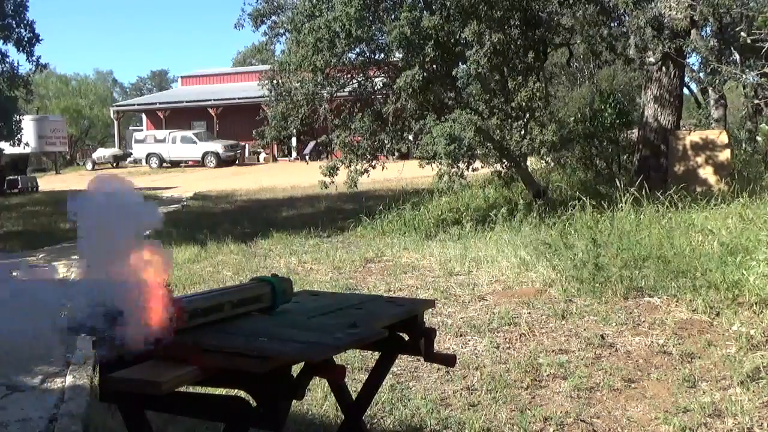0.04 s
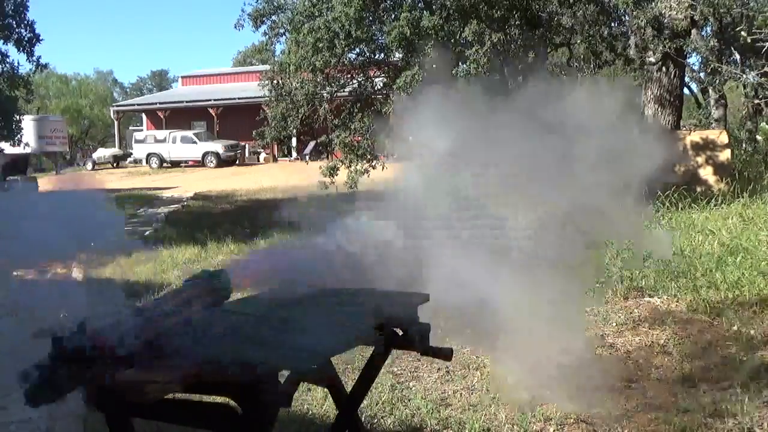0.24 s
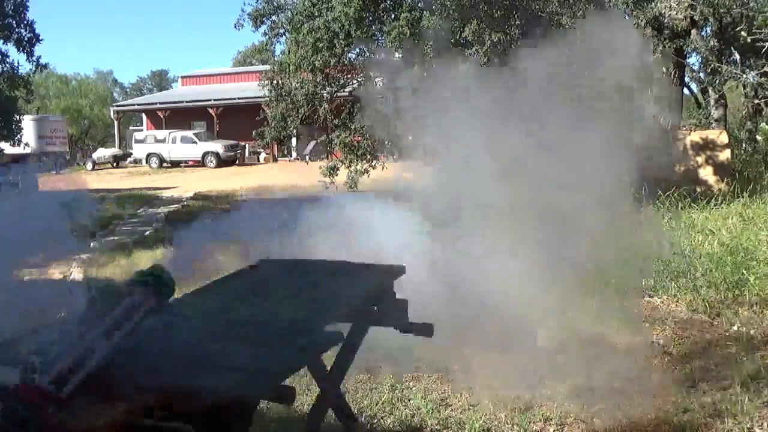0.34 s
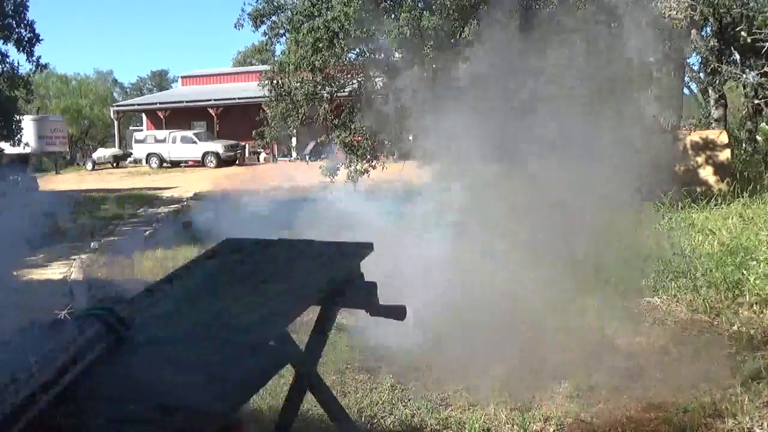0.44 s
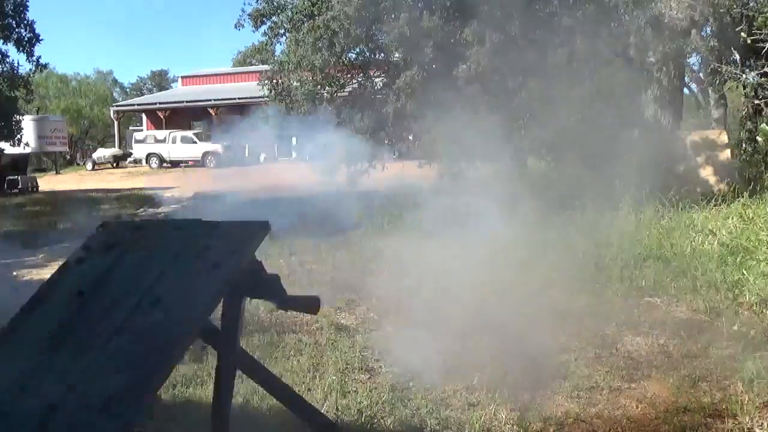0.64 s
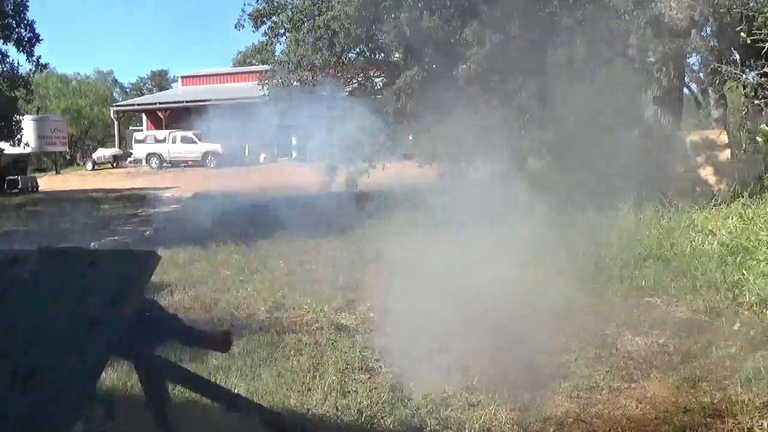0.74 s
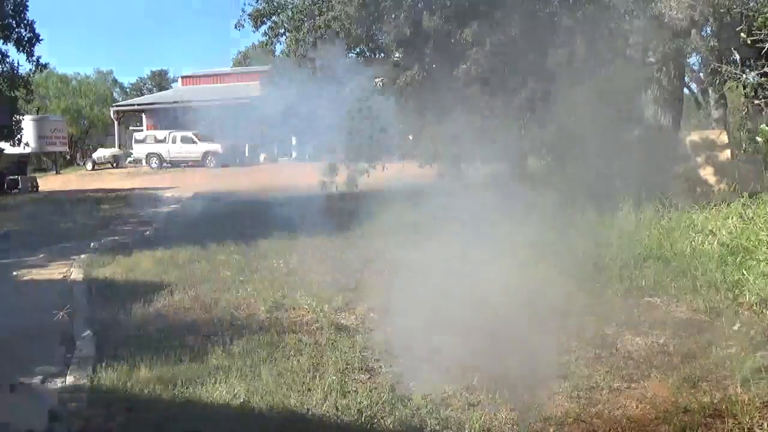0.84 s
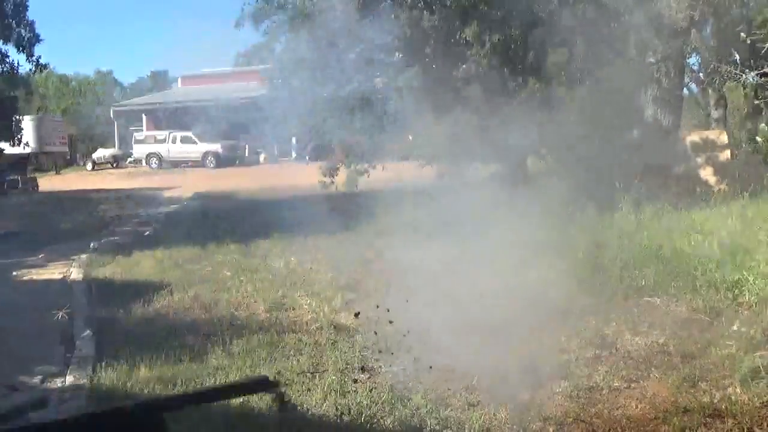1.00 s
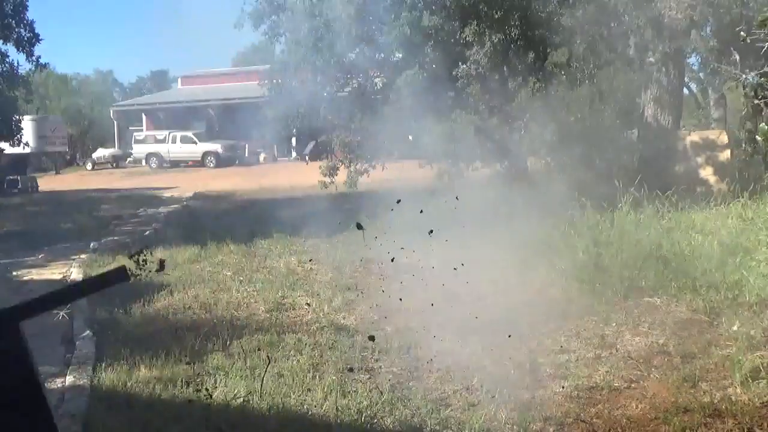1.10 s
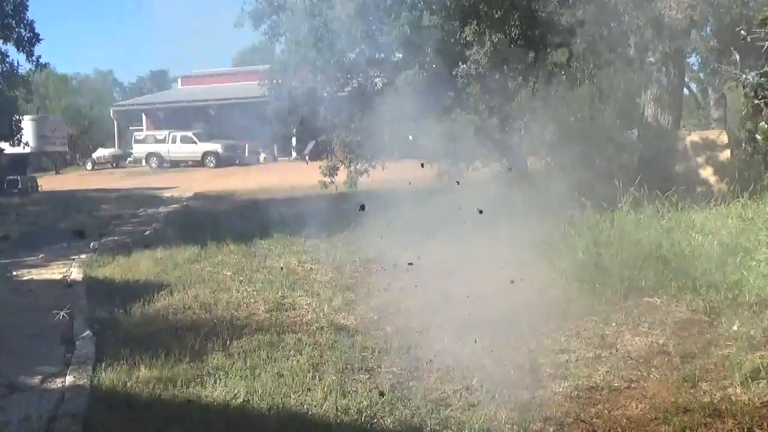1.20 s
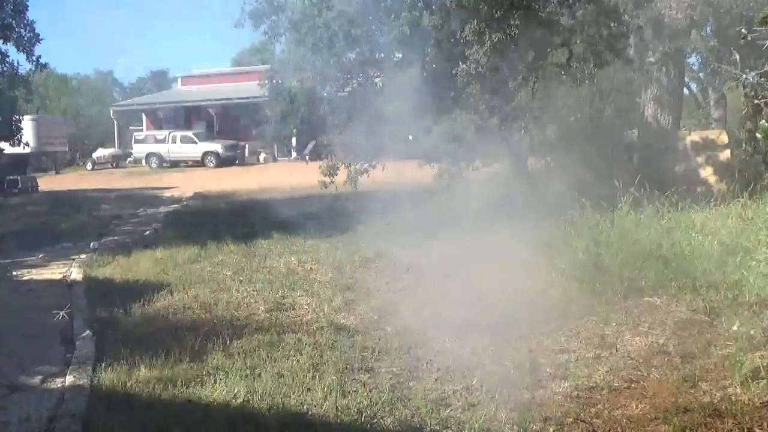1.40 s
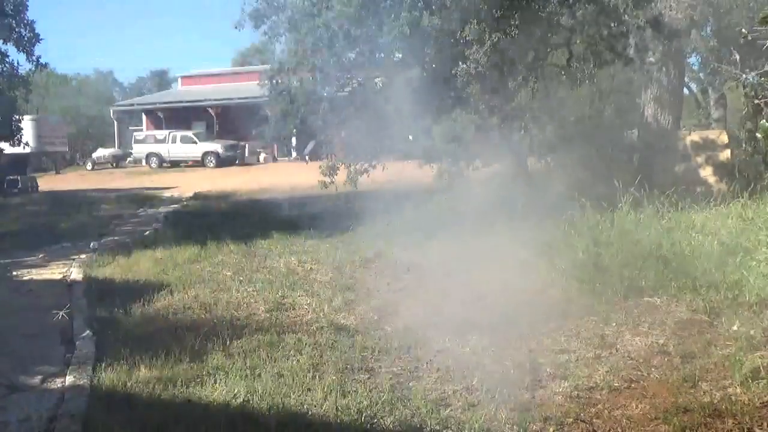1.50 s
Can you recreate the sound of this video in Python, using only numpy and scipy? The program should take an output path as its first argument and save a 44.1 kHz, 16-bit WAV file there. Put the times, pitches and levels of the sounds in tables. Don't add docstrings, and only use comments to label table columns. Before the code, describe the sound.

After a short sputtering fizz, a small cannon booms, overloading a nearby camera microphone in an open yard; the roar scatters and dulls within half a second, then steel and boards thud, clatter, bounce and finally clink.

```python
import sys
import numpy as np
from scipy import signal
from scipy.fft import rfft, irfft, next_fast_len
from scipy.io import wavfile
from scipy.ndimage import uniform_filter1d, map_coordinates

SR = 44100
rng = np.random.default_rng(int(sys.argv[2]) if len(sys.argv) > 2 else 0)


def undo_db(level):
    steps = np.asarray(level, float) / 20
    return 10 ** steps


def generate_wav(sig):
    pcm = np.round(np.clip(np.atleast_2d(sig).T, -1, 1) * 32767).astype(np.int16)
    wavfile.write(sys.argv[1], SR, pcm)


N = 68355
T = np.arange(N) / SR
BLAST_S = 0.21
BOOM_SPREAD = 0.17


def unit(x):
    return x / np.sqrt(np.mean(x ** 2) + 1e-20)


def along(points, hz):
    f, v = np.transpose(points)
    return np.interp(np.log(hz + 1), np.log(f + 1), v)


def peaks_db(rows, hz):
    return sum(db / (1 + ((hz - centre_hz) / width_hz) ** 2) for centre_hz, width_hz, db in rows)


def shaped(x, gain_db):
    hz, t, z = signal.stft(x, SR, nperseg=256, noverlap=192)
    z = z * undo_db(gain_db(hz[:, None], t[None]))
    return signal.istft(z, SR, nperseg=256, noverlap=192)[1][..., :x.shape[-1]]


def filtered(x, response):
    m = next_fast_len(x.shape[-1] + 8192)
    return irfft(rfft(x, m) * response(np.fft.rfftfreq(m, 1 / SR)), m)[..., :x.shape[-1]]


def coloured(x, colour, hollows=()):
    return unit(filtered(x, lambda hz: undo_db(along(colour, hz) + peaks_db(hollows, hz))))


def noise():
    return rng.standard_normal((2, N))


def pulses(per_s, scatter_db):
    on = rng.random((2, N)) < per_s / SR
    return unit(on * noise() * undo_db(scatter_db * noise()))


def stereo(pair, alike):
    def mid_side(hz):
        turn = np.arccos(np.clip(along(alike, hz), -1, 1)) / 2
        return np.array([np.cos(turn), np.sin(turn)])

    mid, side = filtered(pair, mid_side)
    return np.array([mid + side, mid - side])


def pan(lead_db):
    return undo_db([[lead_db / 2], [-lead_db / 2]])


def strike(s, rise_s, t60_s):
    u = np.maximum(T - s, 0)
    return (1 - np.exp(-u / rise_s)) * undo_db(-60 * u / t60_s)


def low(s, db, hz, rise_s, t60_s, spread):
    turn = 2 * np.pi * hz * (T - s)
    detune = np.exp(spread * rng.choice([-1, 1]))
    wave = np.sin(turn) + 0.5 * np.sin(turn * detune + rng.normal())
    return undo_db(db) * strike(s, rise_s, t60_s) ** 1.26 * wave


def add_tone(out, s, db, hz, t60_s, rise_s, blur_hz):
    start = round(s * SR)
    t = T[:N - start][:round(t60_s * SR)]
    wander = np.cumsum(uniform_filter1d(rng.standard_normal(SR), size=80))[:len(t)]
    wander = wander * np.sqrt(2 * np.pi * blur_hz / SR)
    envelope = undo_db(db - 60 * t / t60_s) * (1 - np.exp(-t / rise_s))
    out[..., start:][..., :len(t)] += envelope * np.sin(2 * np.pi * hz * t + wander)


def fuse():
    # t/s, level/dB, brightness/(dB per octave)
    sputter = [
        (0, -36, 2),
        (0.03, -29, 2),
        (0.071, -30.5, 0),
        (.13, -35.5, 0),
        (.186, -32.5, 2.5),
    ]
    # f/Hz, level/dB
    fuse_colour = [(25, -20), (50, 0), (100, 2), (170, -4.5), (275, 1), (2300, -8), (11000, -14)]
    # f/Hz, level/dB
    jet_colour = [(200, -57), (400, -20), (1800, -19), (3200, -9.5), (11000, -18.5)]
    jet_s, jet_db, jet_rise_s, jet_t60_s = 0.186, -17.5, 0.016, 0.12

    s, level_db, tilt_db = np.transpose(sputter)
    hiss = coloured(pulses(12000, 1.1), fuse_colour)
    hiss = shaped(hiss, lambda hz, t: np.interp(t, s, tilt_db) * np.log2((hz + 300) / 3000))
    hiss = stereo(hiss, [(100, 0.99), (8000, 0.83)])
    hiss = hiss * undo_db(np.interp(T, s, level_db) - 390 * np.maximum(T - BLAST_S, 0))

    jet = stereo(coloured(pulses(18000, 1.9), jet_colour), [(1000, 0.89)])
    rise = np.clip((T - jet_s) / jet_rise_s, 0, 1) ** 2
    fall = undo_db(-60 * np.maximum(T - jet_s - jet_rise_s, 0) / jet_t60_s)
    return pan(2.5) * (hiss + undo_db(jet_db) * rise * fall * jet)


def floor():
    # f/Hz, level/dB
    air_colour = [(30, -1.5), (120, -6), (215, 3), (420, -11), (620, -9.5), (2500, -16.5), (5500, -20.5),
                  (11000, -27)]
    return undo_db(-47.5) * pan(2.2) * stereo(coloured(noise(), air_colour), [(100, 1.0), (5000, 0.52)])


def blast():
    # t/s, level/dB
    roar = [(0.209, -36), (.213, -16), (0.227, -9.5), (0.251, -11), (0.279, -14.5), (.39, -14),
            (0.422, -14.5), (0.47, -14.5), (0.5, -19.5), (0.573, -23), (.6, -26), (.675, -28.5), (.71, -32),
            (.85, -39), (1.55, -74)]
    # f/Hz, level/dB
    echo_colour = [(59, -41), (100, -22), (313, -0.5), (905, -7.5), (1170, -8), (1840, -8.5), (1990, -11.5),
                   (2780, -11.5), (11000, -14), (14300, -63), (22000, -120)]
    # f/Hz, width/Hz, level/dB
    table_hollows = [(694, 40, 8), (1024, 30, 6), (1165, 60, 5), (2850, 300, 3)]
    # f/Hz, loss/(dB per s)
    air_loss = [(150, 0), (400, 34), (900, -3), (3000, -0.5), (6000, 24.5), (8500, 50), (11000, 95)]
    # f/Hz, likeness/1
    blast_alike = [(100, 0.95), (700, 0.52), (3000, 0.66), (11000, 0.79)]
    # f/Hz, lead/dB
    echo_lead = [(300, 4.5), (2000, 1.5), (10000, 0)]
    # f/Hz, level/dB
    rumble_colour = [(20, -23), (40, -25), (80, -12.5), (125, -3), (170, -9.5), (260, -15), (500, -76)]
    # f/Hz, level/dB
    crack_colour = [(300, -31), (600, -9), (1800, -9.5), (2700, -3), (5000, -5), (11000, -17)]
    swell_s, swell_length_s, swell_hz, swell_db = 0.44, 0.031, 3850, 5

    def echo_gain_db(hz, t):
        near_time = ((t - swell_s) / swell_length_s) ** 2
        near_pitch = (2 * np.log((hz + 1) / swell_hz)) ** 2
        swell = swell_db * np.exp(-near_time - near_pitch)
        return swell - along(air_loss, hz) * np.clip(t - BLAST_S, 0, 0.78)

    echoes = shaped(coloured(pulses(33000, 2), echo_colour, table_hollows), echo_gain_db)
    echoes = stereo(echoes, blast_alike)
    echoes = filtered(echoes, lambda hz: undo_db(np.outer([0.5, -0.5], along(echo_lead, hz))))
    places = [np.arange(2)[:, None] + 0 * T, 60 * T + np.zeros((2, 1))]
    clumps = undo_db(1.1 * map_coordinates(rng.standard_normal((2, 100)), places))

    rumble = pan(3.9) * stereo(coloured(noise(), rumble_colour), [(40, 0.32), (100, 0.97)])
    rumble = rumble * undo_db(-12 + 6 * np.clip(T - BLAST_S, 0, 0.6))
    rumble = rumble * np.clip((T - BLAST_S) / 0.24, 0, 1)

    s, level_db = np.transpose(roar)
    scattered = (echoes * clumps + rumble) * undo_db(np.interp(T, s, level_db, left=-120))

    crack = stereo(coloured(noise(), crack_colour), blast_alike)
    crack = pan(1.6) * undo_db(-4) * strike(0.2148, rise_s=0.0016, t60_s=0.1) * crack
    push_s, push_width_s = 0.2295, 0.0012
    u = np.maximum(T - push_s, 0) / push_width_s
    push = pan(8) * undo_db(-7) * u * (2.2 - u) * np.exp(-u)
    return crack + push + scattered


def debris():
    # t/s, level/dB, f/Hz, t60/s
    grit_ticks = [(0.582, -34, 8400, 0.026), (0.728, -38, 7700, 0.096), (1.291, -39, 9300, 0.023),
                  (1.35, -38.5, 9100, 0.012), (1.361, -33, 7450, 0.0082), (1.367, -22, 9400, 0.0034),
                  (1.372, -28.5, 9300, 0.0064), (1.393, -22, 9500, 0.003), (1.417, -44, 8100, 0.044),
                  (1.485, -42.5, 8200, 0.06)]

    def high(hz, size):
        band = lambda f: np.exp(-(np.log((f + 1) / hz) / 0.2) ** 2)
        return unit(filtered(rng.standard_normal(size), band))

    ticks = sum(undo_db(db) * strike(s, 0.0005 + t60_s / 20, t60_s) * high(hz, N)
                for s, db, hz, t60_s in grit_ticks)
    leaves = high(8800, (2, N)) * undo_db(-49.5 - 16 * (T - 0.64)) * (T > BLAST_S)
    return pan(2.4) * ticks + leaves


def booms():
    # t/s, level/dB, f/Hz
    wall_slaps = [(.221, -25, 900), (.227, -21, 428), (.236, -25, 610), (.2475, -20, 980), (.251, -3, 570),
                  (.261, -13, 684), (.264, -5.5, 1032)]
    # t/s, level/dB, f/Hz, left lead/dB
    wall_booms = [(0.279, -18, 121, 12), (0.371, -6.5, 150.3, 10), (0.424, -8.5, 110, 11),
                  (0.428, -12.5, 286.6, 15.5), (0.458, -12, 147, 13.5), (0.521, -10.5, 128, 9),
                  (0.555, -21, 140, 19), (0.678, -24, 117, 5), (0.778, -30.5, 160, 0),
                  (0.853, -31.5, 132.5, 0)]
    slaps = sum(pan(rng.normal(1.6, 8.3)) * low(s, db, hz, 0.0037, 0.042, BOOM_SPREAD)
                for s, db, hz in wall_slaps)
    echoes = sum(pan(lead_db) * low(s, db, hz, 0.015, 0.2, BOOM_SPREAD)
                 for s, db, hz, lead_db in wall_booms)
    return slaps + echoes


def mount():
    # t/s, level/dB, t60/s, brightest f/Hz, sizzle/dB
    contacts = [(0.881, -33.5, 0.083, 1950, -37), (0.9054, -16, 0.041, 2780, -12.5),
                (0.909, -21.5, 0.048, 4300, -1), (.917, -20.5, 0.56, 2850, -8),
                (0.9387, -15, 0.3, 3850, -6), (0.9587, -19, 0.49, 3840, -22), (.971, -17, 0.17, 1900, -6),
                (0.984, -15.5, 0.14, 2800, -25), (1.005, -22.5, 0.39, 2620, -38),
                (1.02, -19, 0.077, 3620, -28), (1.032, -14.5, 0.041, 3240, -8.5),
                (1.0857, -26.5, 0.16, 3100, -45), (1.097, -39, 0.26, 890, -45),
                (1.1121, -19, .25, 4050, -24), (1.14, -20.5, 0.063, 2390, -50),
                (1.145, -22.5, 0.17, 5340, -23), (1.176, -26.5, 0.54, 1510, -49),
                (1.2063, -11, 0.018, 1530, -66), (1.2126, -29, 0.2, 3240, -42),
                (1.223, -26, 0.4, 2470, -45), (1.352, -33, 0.13, 1120, -49),
                (1.361, -29.5, 0.056, 4150, -25)]
    # f/Hz, level/dB, t60/s
    steel_modes = [(620, -15, .2), (740, -13, .2), (1276, -11, .6), (1782, -10, .25), (2105, -6, .25),
                   (2550, -6, .4), (2681, -9, .85), (2837, -5, .14), (3036, -12, .5), (3359, -11, .2),
                   (3849, -9, .3)]
    # f/Hz, width/Hz, level/dB
    board_hollows = [(1240, 600, 2.5), (1780, 90, -1), (2220, 63, 3), (2650, 680, 3), (3850, 570, 6),
                     (6000, 1200, 5), (9300, 460, 5.5)]
    # t/s, level/dB, f/Hz, t60/s
    knocks = [(.9058, -12, 4210, 0.015), (.9062, -22.5, 6160, 0.026), (.9056, -22, 9640, 0.023),
              (.9068, -12, 2650, 0.015), (.9175, -18, 2794, 0.086), (.9178, -35, 9500, 0.05),
              (.9415, -15.5, 1800, 0.023), (.9425, -13, 3230, 0.034), (.959, -32, 2560, .03),
              (.963, -11.5, 3930, 0.018), (.972, -17, 2156, 0.078), (.979, -10.5, 1780, 0.018),
              (.9855, -18, 3050, 0.017), (.9865, -16.5, 1150, 0.059), (.999, -12.5, 2580, 0.034),
              (1.0045, -29, 2740, .04), (1.005, -17, 1780, 0.049), (1.009, -12.5, 2590, 0.033),
              (1.0205, -15, 4250, 0.014), (1.0238, -14, 2700, 0.015), (1.034, -17, 3010, 0.059),
              (1.034, -30, 9820, 0.045), (1.042, -26, 2053, 0.15), (1.0843, -13, 3000, .014),
              (1.2068, -8, 1030, .022), (1.2128, -11, 3300, .022), (1.087, -25, 2680, .04),
              (1.096, -23, 730, 0.039), (1.1085, -14.5, 670, 0.012), (1.1138, -14, 3860, 0.019),
              (1.1145, -19, 2506, 0.067), (1.1138, -25.5, 8800, 0.019), (1.125, -19, 3900, 0.025),
              (1.13, -20, 2900, 0.062), (1.1405, -16, 2410, 0.031), (1.141, -22, 1300, 0.1),
              (1.149, -15, 2650, 0.024), (1.158, -27.5, 2713, 0.16), (1.213, -15, 1170, 0.038),
              (1.2175, -20.5, 1686, 0.045), (1.225, -27, 1315, 0.073), (1.3611, -21.5, 2220, 0.033)]
    # t/s, level/dB, f/Hz
    ground_thumps = [(0.904, -37, 81), (0.9049, -24.5, 273), (0.907, -15, 153.5), (0.923, -16.5, 198),
                     (0.972, -25, 103), (1.013, -26.5, 118), (1.014, -19.5, 201), (1.027, -24.5, 224),
                     (1.13, -33.5, 106.5), (1.25, -36, 215), (1.291, -40, 105), (1.357, -50, 112.5)]
    low_slope_db, high_slope_db = -2.5, 14
    ring_db, ring_blur_hz, knock_blur = -15, 5, 0.03
    bass_cut_hz = 330

    out = np.zeros((2, N))
    for s, db, t60_s, top_hz, sizzle_db in contacts:
        def colour_db(hz):
            octaves = np.log2((hz + 50) / top_hz)
            peak = np.minimum(low_slope_db * octaves, -high_slope_db * octaves)
            return np.maximum(peak, np.where(hz > top_hz, sizzle_db, -60))

        grit_gain = lambda hz: undo_db(colour_db(hz) + peaks_db(board_hollows, hz))
        grit = unit(filtered(pulses(16000, 1.2), grit_gain))
        grit = stereo(grit, [(1000, 0.84), (9000, 0.7)])
        crack = undo_db(-2) * strike(s, 0.0004, 0.012)
        out += undo_db(db) * (strike(s, 0.0008, t60_s) + crack) * grit
        for hz, mode_db, ring_s in steel_modes:
            tone_db = db + ring_db + mode_db + colour_db(hz) / 3 + rng.normal(0, 3)
            add_tone(out, s, tone_db, hz * np.exp(rng.normal(0, 0.003)), ring_s, 0.001, ring_blur_hz)
    out = filtered(out, lambda hz: hz ** 2 / (hz ** 2 + bass_cut_hz ** 2))

    for s, db, hz, t60_s in knocks:
        add_tone(out, s, db, hz, t60_s, 0.0005, knock_blur * hz)
    out += sum(low(s, db, hz, 0.0036, 0.13, spread=0.2) for s, db, hz in ground_thumps)
    lead_db = 5 - 2 * (T - contacts[1][0])
    return out * undo_db([lead_db / 2, -lead_db / 2])


def yard(x):
    # f/Hz, t60/s
    yard_t60 = [(200, 0.44), (2000, 0.17), (10000, 0.2)]
    tail = shaped(rng.standard_normal((2, SR // 2)), lambda hz, t: -60 * t / along(yard_t60, hz))
    tail = tail / np.linalg.norm(tail[0])
    late = np.pad(x, (600, 0))[None]
    return undo_db(-16) * signal.fftconvolve(late, tail, axes=1)[:, :N]


def scene():
    fall = mount()
    return fuse() + floor() + blast() + debris() + booms() + fall + yard(fall.mean(0))


def roll_off(x):
    return signal.sosfilt(signal.butter(12, 11740, fs=SR, output="sos"), x)


def record(dry):
    ceiling, knee = 0.93, 5
    top_hz, edge_hz, bass_hz = 11030, 90, 40

    def band_limit(hz):
        edge_db = np.clip((hz - top_hz) / edge_hz * 20, 0, 42)
        return undo_db(-edge_db - np.clip((hz - top_hz) / 60, 0, 60))

    x = dry / (1 + np.abs(dry / ceiling) ** knee) ** (1 / knee)
    x = filtered(x, band_limit)
    x = filtered(x, lambda hz: hz / np.hypot(hz, bass_hz))
    return roll_off(x)


dry = scene()
out = record(dry)
generate_wav(out)
```